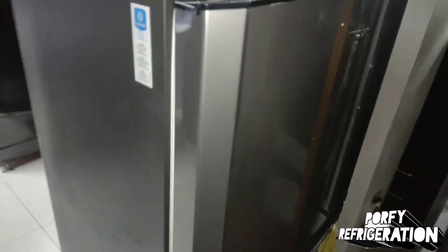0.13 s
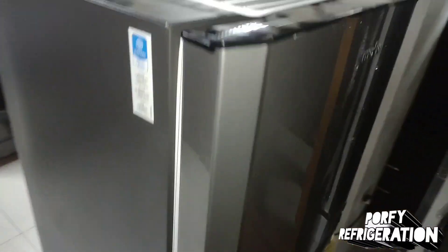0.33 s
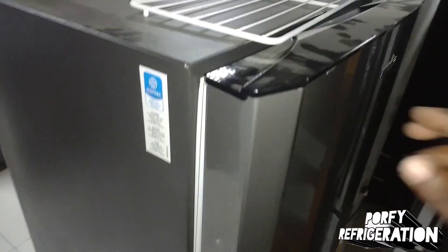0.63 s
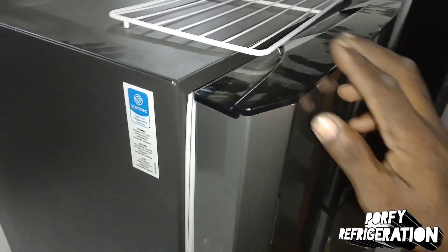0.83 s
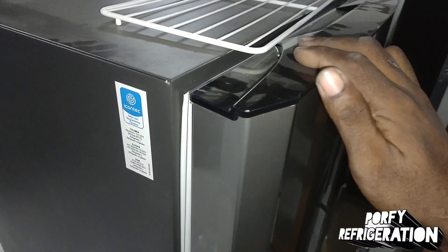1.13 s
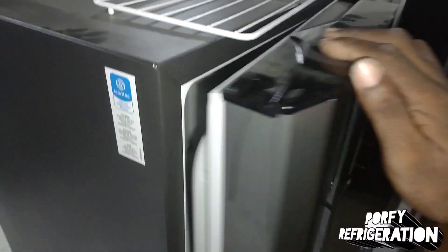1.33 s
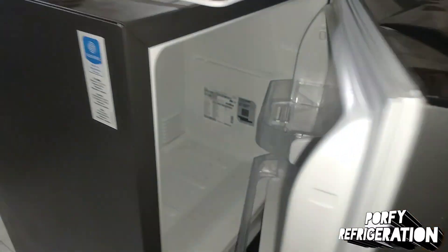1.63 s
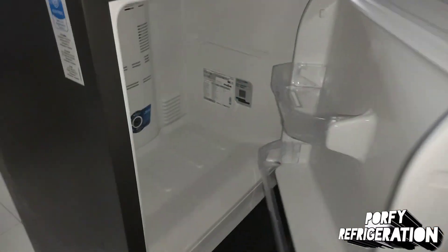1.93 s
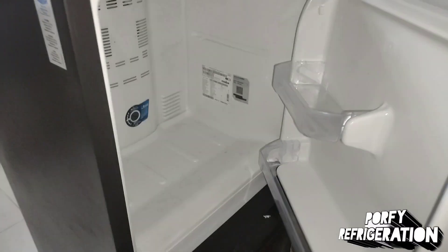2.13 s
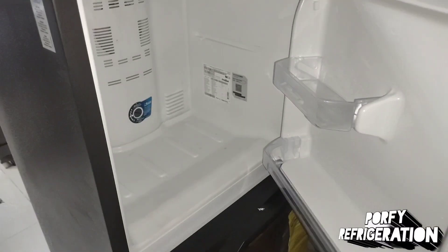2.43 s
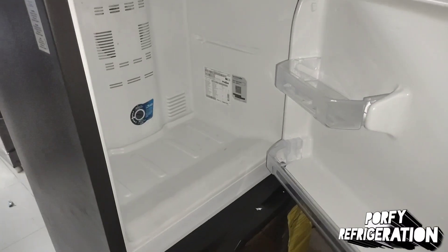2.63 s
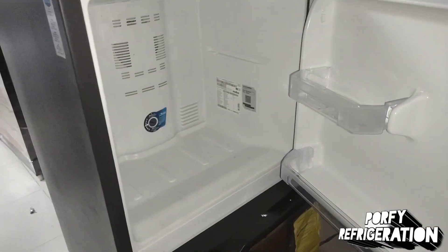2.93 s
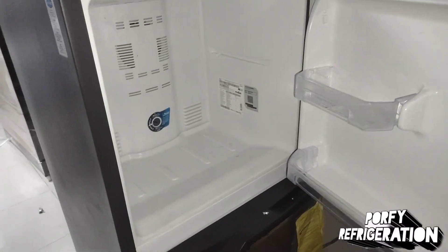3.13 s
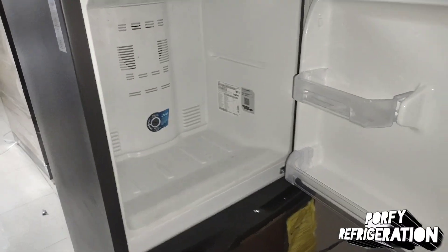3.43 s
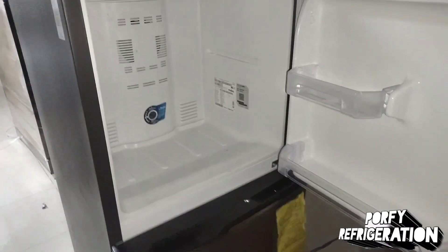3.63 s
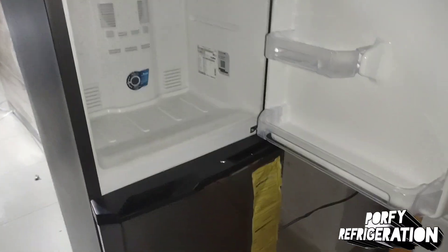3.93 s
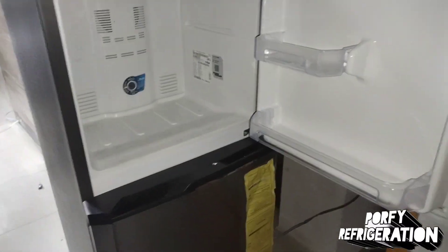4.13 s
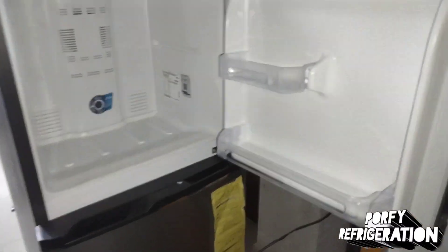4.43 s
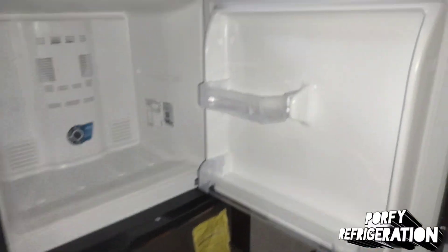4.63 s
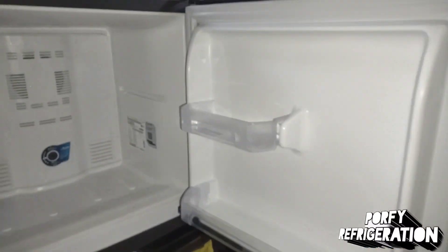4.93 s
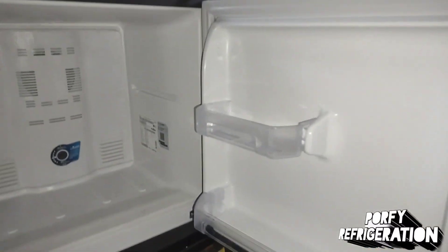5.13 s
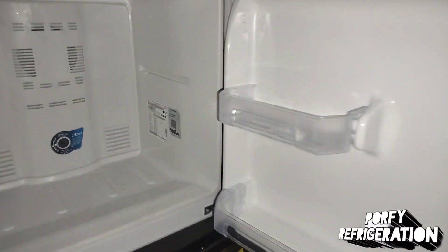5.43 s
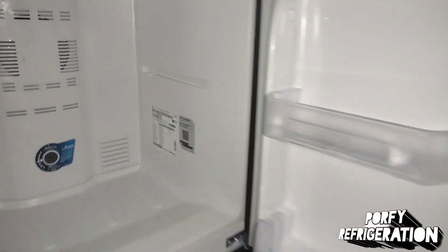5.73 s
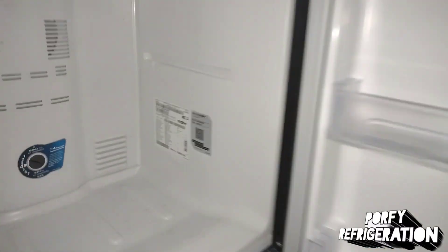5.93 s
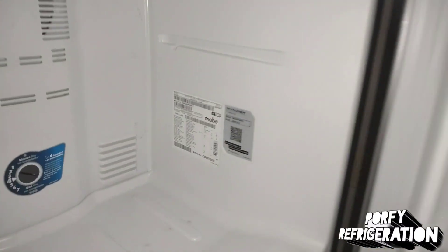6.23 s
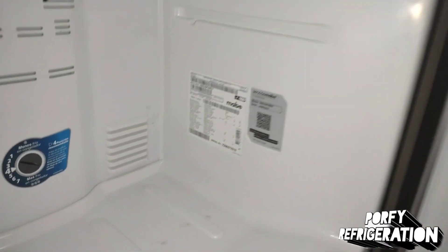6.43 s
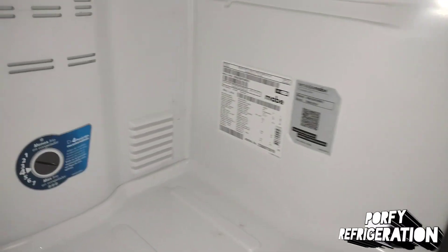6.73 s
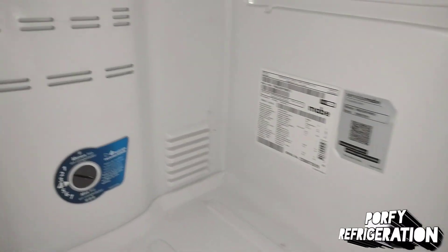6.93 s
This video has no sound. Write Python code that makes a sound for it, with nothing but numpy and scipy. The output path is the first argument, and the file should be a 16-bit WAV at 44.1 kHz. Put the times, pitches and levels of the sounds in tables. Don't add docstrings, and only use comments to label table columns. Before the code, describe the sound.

From 0 s a hushed workshop: faint room tone, a thin distant machine drone, a muffled fridge fan and a brief draught fading away. Handling scuffs and a sharp finger tick come at about 0.1 s, with soft rubbing after. At 1.0 s a hand meets the door with a low dull thump; light ticks and rubs follow. Around 1.35-1.45 s the rubber seal peels with bright scuffs and quick ticks. The fan hum and air rush swell until about 2 s, while a hollow, bottle-like resonance climbs in pitch and rings on. A steady low hum with soft airflow then holds, with faint rustles and a little knock at 3.4 s. A clear plastic click lands at 4.7 s. From about 5.8 s the handheld stereo microphone moves in close: hum and roar grow markedly fuller until 7.1 s, with small rubs and a tick near 6.4 s.

```python
import sys
import numpy as np
from scipy import signal
from scipy.fft import rfft, irfft, next_fast_len
from scipy.io import wavfile
from scipy.ndimage import uniform_filter1d, map_coordinates

SR = 44100
rng = np.random.default_rng(int(sys.argv[2]) if len(sys.argv) > 2 else 0)


def materialize(psi):
    bounded = np.clip(np.atleast_2d(psi).T, -1, 1)
    quanta = np.round(bounded * 32767).astype(np.int16)
    wavfile.write(sys.argv[1], SR, quanta)


def undo_db(level):
    steps = np.asarray(level, float) / 20
    return 10 ** steps


N = 313110
T = np.arange(N) / SR

# (frequency [Hz], left-right likeness [0-1])
ALIKE = [(60, 0.67), (100, .99), (160, 1), (270, 0.97), (450, 0.88), (740, 0.91), (1220, .38), (2010, .02)]
LEAD_S = 8 / SR

# (frequency [Hz], density [dB per Hz])
ROOM = [(24, -41), (60, -10.5), (110, -11.5), (200, -6.5), (270, -5.5), (370, -17.5), (463, -14.5),
        (552, -7.5), (625, -19), (823, -14.5), (1200, -38), (4730, -31), (9060, -29.5), (11900, -35.5),
        (15700, -38)]
ROOM_DB = -72
# (frequency [Hz], level [dB rms])
DRONE = [(176, -66), (546, -79), (572, -80), (835, -81)]

# (time [s], nearness [dB], detour of the cabinet echo [m])
WALK = [(2, -1, 2.26), (3, -0.13, 2.39), (3.7, 0, 2.34), (4.4, -1.47, 2.17), (5, 0, 1.97),
        (5.5, -1.3, 1.66), (6, 2.55, 1.29), (6.5, 7, 1.4), (6.8, 8.5, 1.94), (7.1, 10, 1.84)]
# (time [s], place [0 outside, 1 mouth, 2 inside])
PLACE = [
    (0, 0),
    (4.4, 0.14),
    (5.0, 1.44),
    (6.2, 0.88),
    (6.55, 2),
    (7.1, 2),
]
# (time [s], left-right difference [dB])
TURN = [(0.0, 1), (0.47, 0.5), (1.32, 0.5), (3.3, -0.5), (4.62, 1), (5.76, 0), (6.76, 3), (7.06, 1.5)]
# (frequency [Hz], left-right difference [dB])
FACING = [(60, 1), (300, -1), (1200, 0.5), (5000, 0), (12000, 4)]
WIDE_DB, WIDE_HZ = 3, 600

PULL_S, SWING_S = 1.35, 0.7
NECK_HZ, CLIMB_HZ, CLIMB_S = 77, 95, 0.95
RING_DB, RING_HZ = 23, 8
NECK_DB, NECK_S = 10, 0.38
AFTER_S, AFTER_DB, AFTER_T60_S = 1.74, -37.5, 1.8

BLADE_HZ = 109.7
# (open level [dB], shut level [dB], growth [dB per dB of nearness], power of the gap,
# echo phase [rad])
TONES = [(-47.5, -74, 2.09, 0.68, 0.01), (-41.5, -68, 1.3245, 1.12, 0.65), (-45, -89, 0.54, 1.9, 2.9)]
# (multiple, level against the 3rd [dB])
UPPER = [(4, -17.5), (5, -17.5)]
ECHO, SOUND_M_S = 0.4, 343

# (open level [dB], shut level [dB], growth [dB per dB of nearness], power of the gap,
# opening draught [dB])
FLOWS = [(-43.5, -75.5, 1.29, 1.2, 5.5), (-46, -78.5, 0.7337, 1.2, 17), (-57, -78, 1.1866, 0.81, -7)]
DRAUGHT_S = 0.27
# (frequency [Hz], density [dB per Hz])
ROAR = [(20, -52), (45, -20), (58, -18), (72, -19.5), (90, -14.5), (120, -0.5), (155, 0), (185, 0),
        (250, -4), (300, 1.5), (370, -5.5), (420, -23), (600, -23), (1000, -120)]
# (frequency [Hz], boost [dB])
BOOM = [(72, -7.5), (130, -1.5), (160, 1), (250, 1), (300, -2), (400, 1.5)]
# (frequency [Hz], density [dB per Hz])
OUTSIDE = [(220, -35), (380, -9), (470, -2), (536, 0.5), (727, -7), (819, -14.5), (986, -9.5),
           (1230, -15.5), (2810, -26), (3960, -42.5), (9000, -46), (11700, -65), (19800, -120)]
MOUTH = [(220, -34), (380, -1), (470, -8), (737, -5), (1080, -29), (1250, -17), (1410, -35), (1630, -17.5),
         (1860, -37.5), (2130, -29), (9000, -65.5), (11700, -91), (19800, -120)]
INSIDE = [(220, -18), (380, -1), (493, -9), (545, -3), (595, -6), (931, -9), (1300, -15.5), (1440, -20.5),
          (2380, -19), (4430, -38), (12000, -61), (15600, -84), (22000, -120)]
# (rush [dB], vent hiss [dB])
SHADE_DB = [(-0.53, 1.12), (-1, -4), (0.25, -1.5)]

# (frequency [Hz], density [dB per Hz])
CLOTH = [(410, -45), (700, 0), (1110, -7), (1790, -2), (2170, -3.5), (2630, -2), (9000, -8), (11700, -40),
         (19800, -120)]
SHEEN = [(3530, -40.5), (6000, -5.5), (8590, -5), (10700, -5.5), (11700, -9.5), (13500, -10),
         (15800, -11.5)]
# (middle [s], half length [s], level [dB], sheen [dB], left-right difference [dB])
SLIDES = [(0.033, 0.081, -66.5, -12, -2.5), (0.194, 0.12, -64, -15, -6), (.45, 0.29, -71, 0.5, -2),
          (1.15, 0.2, -78, 1.5, 1.5), (1.278, 0.069, -79, 10.5, -1), (1.38, 0.054, -60.5, -8, -4),
          (1.587, 0.3, -71.5, 1, -2), (2.182, 0.12, -64.5, -7.5, -5), (2.4, 0.2, -73, 0.5, 0.5),
          (3.85, 0.15, -66, -3, -2.5), (4.02, 0.063, -66.5, 1, 0), (4.305, 0.38, -71.5, -5.5, -1),
          (4.907, 0.034, -67, -2.5, -15), (5.1, 0.3, -73.5, -6.5, -4), (6.05, 0.24, -71, -6.5, -2.2),
          (6.347, 0.076, -61, -17, -3), (6.7, 0.28, -73, 4, 5.5), (7.065, .13, -64, -9, -0.5)]
# (time [s], level [dB], T60 [s], sheen [dB], left-right difference [dB])
SCUFFS = [(.09, -57, .6, 3, -2), (.125, -57.5, 0.51, -6.5, 1), (.997, -67, .3, -12, -5.5),
          (1.315, -57, 0.41, 9.5, 1.5), (1.41, -52.5, .4, 5.5, 0.5), (1.44, -52.5, 0.26, -5, -2.5),
          (1.78, -67.5, 1.8, 5.5, -2), (3.57, -71.5, 1.8, 6, 0), (4.475, -68, .6, 2.5, 0),
          (4.692, -73.5, 0.44, 2, 10.5), (5.73, -72, 0.61, 7.5, -1.5), (6.4, -64, 0.29, -0.5, 7)]
SCUFF_RISE_S = 0.0059
# (time [s], level [dB], frequency [Hz], half length [s], sharpness [Q])
PUFFS = [
    (2.49, -61.5, 2900, 0.066, 9),
    (6.6, -65, 7000, .006, 1.2),
    (1.335, -60, 1300, 0.02, 0.95),
    (.65, -82, 3107, 0.61, 60),
    (.066, -64, 5000, .005, 1),
]
# (time [s], peak [dB], knock [dB], tick frequency [Hz], left-right difference [dB])
TICKS = [(0.1246, -33.5, -11.5, 6900, 11), (0.9986, -47.5, 4, 2700, 0.5), (1.086, -47, -15, 9330, 11),
         (1.2634, -42.5, -21, 9100, 3), (1.3215, -39, -12, 8760, 5), (1.4158, -32, -15, 8660, -2),
         (1.4434, -43, -17, 5450, 12), (1.461, -38, -16.5, 4440, -3), (4.559, -52.5, 8, 3110, 12),
         (4.6895, -55.5, 11, 3000, 17.5), (4.7215, -53, 7.5, 3030, 11.5), (5.529, -59, 7.5, 3110, 6),
         (5.7395, -59, 11, 4400, -1), (6.406, -49, -12, 7500, 6)]
# (time [s], peak [dB], frequency [Hz], T60 [s])
THUDS = [
    (.115, -53, 260, 0.2),
    (.998, -40.5, 112, 0.08),
    (1.010, -49, 360, .03),
    (3.40, -42, 1430, .015),
    (1.46, -54, 92, .3),
]
# (time [s], peak [dB], frequency [Hz], T60 [s])
CLICK = [(4.6881, -22, 660, .012), (4.6887, -32, 900, .008), (4.6893, -37, 1600, .007),
         (4.6897, -38, 2700, .006), (4.6895, -49, 4200, .004)]


def unit(x):
    return x / np.sqrt(np.mean(x ** 2) + 1e-20)


def along(points, hz):
    f, v = np.transpose(points)
    return np.interp(np.log(hz + 1), np.log(f + 1), v)


def curves(rows):
    s, *cols = np.transpose(rows)
    return [np.interp(T, s, c) for c in cols]


def wobble(rate):
    return map_coordinates(rng.standard_normal(int(N * rate / SR) + 4), [T * rate])


def filtered(x, response):
    m = next_fast_len(N + SR // 2)
    return irfft(rfft(x, m) * response(np.fft.rfftfreq(m, 1 / SR)), m)[..., :N]


def panned(db):
    return undo_db(np.array([db / 2, -db / 2]))


def patches(x, depth_db, size, bins, frames):
    z = signal.stft(x, nperseg=size)[2]
    field = rng.standard_normal(z.shape[1:])
    field = uniform_filter1d(field, size=bins, axis=0)
    field = uniform_filter1d(field, size=frames, axis=1)
    return signal.istft(z * undo_db(depth_db * unit(field)), nperseg=size)[1][:, :N]


def noise(spectrum, patchy_db, grain_db=0, standing_db=1.5):
    pair = patches(rng.standard_normal((2, N)), patchy_db, size=512, bins=6, frames=12)
    pair = patches(pair, standing_db, size=2048, bins=2, frames=24)
    pair = pair * undo_db(grain_db * wobble(400))

    def mid_side(hz):
        angle = np.arccos(np.clip(along(ALIKE, hz), -1, 1)) / 2
        return undo_db(along(spectrum, hz)) * [np.cos(angle), np.sin(angle)]

    def port_delay(hz):
        return np.exp(1j * np.pi * hz * LEAD_S * np.array([[1], [-1]]))

    mid, side = filtered(pair, mid_side)
    return unit(filtered(np.array([mid + side, mid - side]), port_delay))


def tone(turns, db, lag):
    return np.sqrt(2) * undo_db(db) * np.sin(2 * np.pi * turns + np.array([[lag], [-lag]]) / 2)


def workshop():
    lines = 0
    for hz, db in DRONE:
        turns = hz * T + hz / 20000 * wobble(5.6)
        lines = lines + tone(turns, db + hz / 800 * wobble(11), lag=0.77)
    rumble_colour = [(15, -13), (40, -8.0), (70, 2.5), (100, -24), (200, -120)]
    rumble = undo_db(-78) * noise(rumble_colour, patchy_db=-3.5)
    return undo_db(ROOM_DB + 7) * noise(ROOM, patchy_db=-0.3, standing_db=2.0) + rumble + lines


def leak(open_db, shut_db, power):
    gap = np.clip((T - PULL_S) / SWING_S, 0, 1)
    return np.hypot(undo_db(shut_db), undo_db(open_db) * gap ** power)


def neck_hz(t):
    return NECK_HZ + CLIMB_HZ * np.tanh((t - PULL_S) / CLIMB_S)


def blades():
    turns = np.cumsum(BLADE_HZ + 0.05 * wobble(1)) / SR
    near_db, detour_m = curves(WALK)
    orders = []
    for k, (open_db, shut_db, grows, power, phase) in enumerate(TONES, start=1):
        hz = k * BLADE_HZ
        echo = abs(1 + ECHO * np.exp(1j * (2 * np.pi * hz * detour_m / SOUND_M_S + phase)))
        ring_db = RING_DB / (1 + ((hz - neck_hz(T)) / RING_HZ) ** 2)
        heard_db = open_db + grows * near_db + ring_db + 20 * np.log10(echo)
        orders.append((k, leak(heard_db, shut_db, power)))
    first, third = orders[0][1], orders[-1][1]
    orders += [(k, third * undo_db(db)) for k, db in UPPER]
    orders.append((0.533, first * undo_db(-27)))
    out = 0
    for k, gain in orders:
        level_db = 0.44 + 0.29 * wobble(3.2)
        out = out + gain * tone(k * turns + rng.random(), level_db, lag=0.078 + 0.032 * k)
    return out


def air():
    near_db = curves(WALK)[0]
    gains = []
    for open_db, shut_db, grows, power, draught_db in FLOWS:
        draught = draught_db * np.exp(-T / DRAUGHT_S)
        gains.append(leak(open_db + grows * near_db, shut_db + draught, power))
    roar_gain, rush_gain, hiss_gain = gains
    place, = curves(PLACE)
    gust_db = 0.4 * wobble(3)
    roar = door_gap(noise(ROAR, patchy_db=0.5, standing_db=0.6))
    inside = np.clip(place, 0, 1)
    boomy = filtered(roar, lambda hz: undo_db(along(BOOM, hz)))
    out = roar_gain * undo_db(3.5 + gust_db) * ((1 - inside) * roar + inside * boomy)
    for k, (colour, (rush_db, vent_db)) in enumerate(zip([OUTSIDE, MOUTH, INSIDE], SHADE_DB)):
        flow = noise(colour, patchy_db=1.13, standing_db=1.97)
        rush = filtered(flow, lambda hz: 1 / (1 + (hz / 1100) ** 6))
        hiss = flow - rush
        share = np.sqrt(np.clip(1 - abs(place - k), 0, 1))
        both = rush_gain * undo_db(rush_db) * unit(rush) + hiss_gain * undo_db(vent_db + 2.04) * unit(hiss)
        out += share * undo_db(gust_db) * both
    return out


def strokes():
    rows = []
    for s, db, t60, sheen_db, side_db in SCUFFS:
        after = np.clip(T - s, 0, None)
        shape = undo_db(db - 60 * after / t60) * (1 - np.exp(-after / SCUFF_RISE_S))
        rows.append((shape, sheen_db, side_db))
    for s, half, db, sheen_db, side_db in SLIDES:
        rows.append((undo_db(db) * np.exp(-((T - s) / half) ** 2 / 2), sheen_db, side_db))
    power = 0
    for shape, sheen_db, side_db in rows:
        gains = np.outer(undo_db([2.2, sheen_db]), panned(side_db + 2.5))
        power = power + np.multiply.outer(gains, shape) ** 2
    return np.sqrt(power)


def rubs():
    dull, bright = strokes()
    rustle = dull * noise(CLOTH, patchy_db=0.8, grain_db=1.5, standing_db=2.2)
    return rustle + bright * noise(SHEEN, patchy_db=0.5, grain_db=1.5)


def ring(x, hz, q):
    return signal.lfilter(*signal.iirpeak(hz, q, SR), x)


def puffs():
    out = np.zeros((2, N))
    for s, db, hz, half, sharp in PUFFS:
        swell = undo_db(db) * np.exp(-((T - s) / half) ** 2)
        out += swell * unit(ring(rng.standard_normal((2, N)), hz, sharp))
    return out


def taps():
    out = np.zeros((2, N + SR))
    t = np.arange(SR // 5) / SR
    for s, db, knock_db, hz, side_db in TICKS:
        snap = rng.standard_normal(len(t)) + 0.36 * rng.standard_normal((2, len(t)))
        tick = ring(snap * undo_db(3.5 - 60 * t / 0.0061), hz, 0.4 + hz / 7000)
        knock = undo_db(knock_db + 4.5) * ring(snap * undo_db(-60 * t / 0.053), 1100, 1.0)
        out[:, round(s * SR):][:, :len(t)] += undo_db(db - 5.0) * panned(side_db)[:, None] * (tick + knock)
    for s, db, hz, t60 in THUDS + CLICK:
        onset = (1 - np.exp(-t * hz * 2)) ** 2
        mode = undo_db(db - 60 * t / t60) * onset * np.sin(2 * np.pi * hz * t)
        out[:, round(s * SR):][:, :len(t)] += mode
    return out[:, :N]


def door_gap(x):
    hz, t, z = signal.stft(x, SR, nperseg=4096)
    boost_db = NECK_DB * np.exp(-((t - PULL_S - NECK_S) / NECK_S) ** 2)
    shape = np.exp(-((hz[:, None] - neck_hz(t)) / 14) ** 2)
    return signal.istft(z * undo_db(boost_db * shape), SR, nperseg=4096)[1][:, :N]


def bottle():
    t = np.clip(T - AFTER_S, 0, None)
    level_db = AFTER_DB - 60 * t / AFTER_T60_S + 1.5 * wobble(12)
    return (1 - np.exp(-t / 0.05)) * tone(np.cumsum(neck_hz(T)) / SR, level_db, lag=0.15)


def scene():
    fan = filtered(blades() + air() + bottle(), lambda hz: panned(along(FACING, hz)))
    bass_side = filtered(fan[0] - fan[1], lambda hz: 1 / (1 + (hz / WIDE_HZ) ** 4)) / 2
    side = bass_side * (undo_db(WIDE_DB * curves(PLACE)[0]) - 1)
    fan = (fan + [side, -side]) * panned(curves(TURN)[0])
    return workshop() + fan + rubs() + puffs() + taps()


def band_limit(x):
    return signal.sosfilt(signal.butter(12, 15810, fs=SR, output="sos"), x)


def record(dry):
    return band_limit(dry)


dry = scene()
out = record(dry)
materialize(out)
```